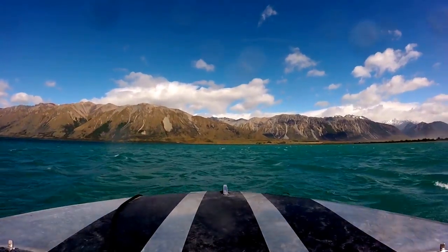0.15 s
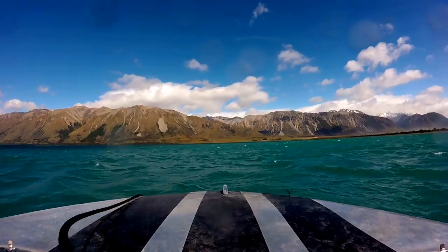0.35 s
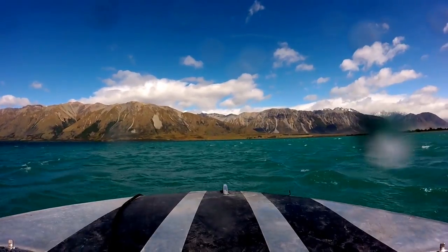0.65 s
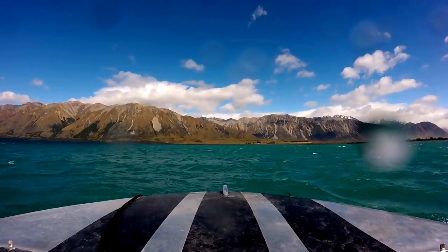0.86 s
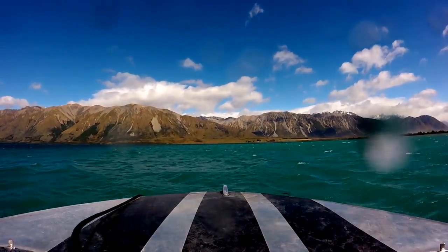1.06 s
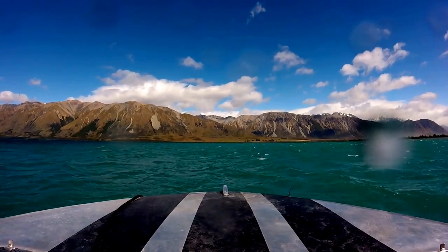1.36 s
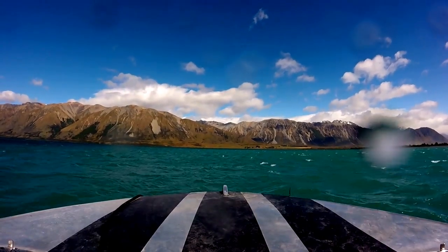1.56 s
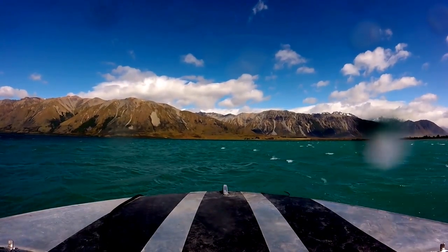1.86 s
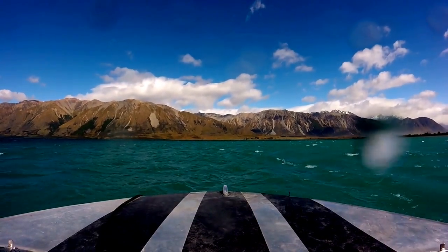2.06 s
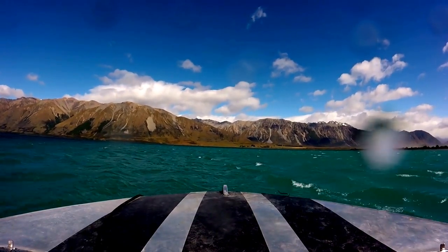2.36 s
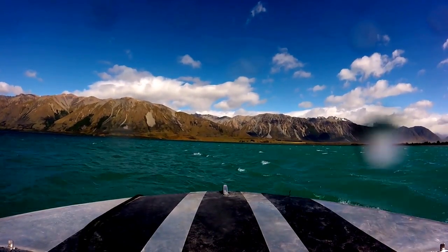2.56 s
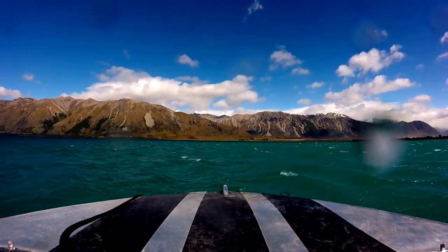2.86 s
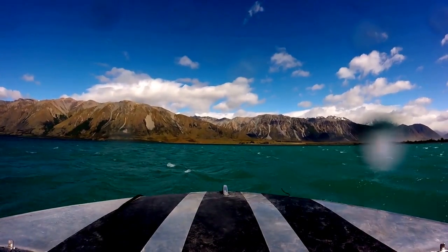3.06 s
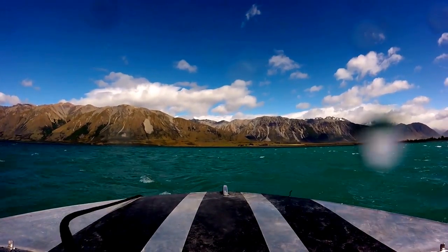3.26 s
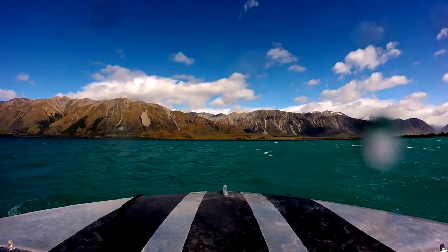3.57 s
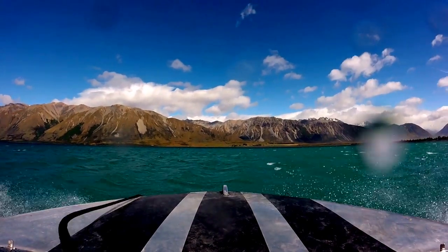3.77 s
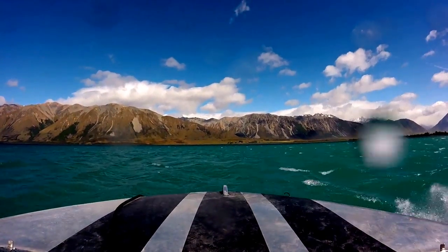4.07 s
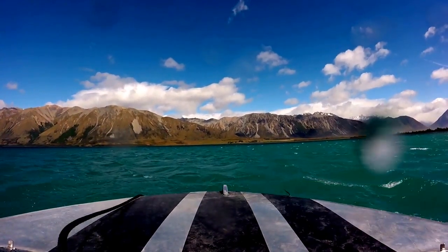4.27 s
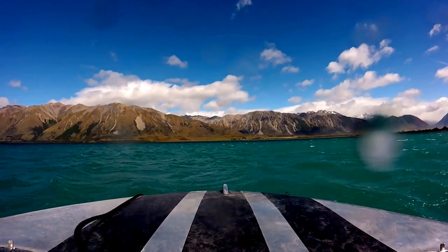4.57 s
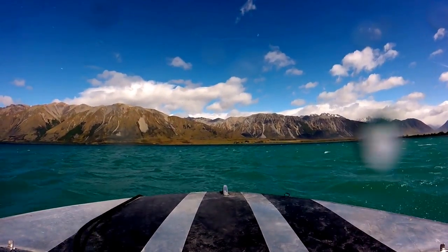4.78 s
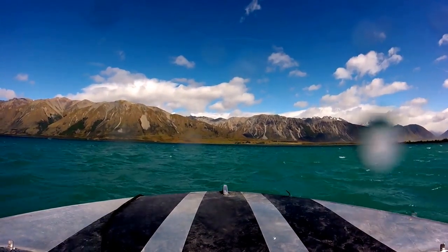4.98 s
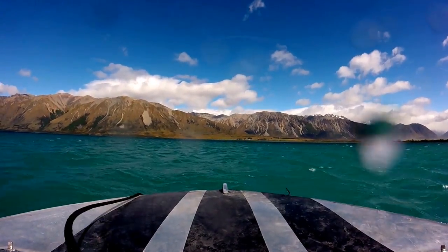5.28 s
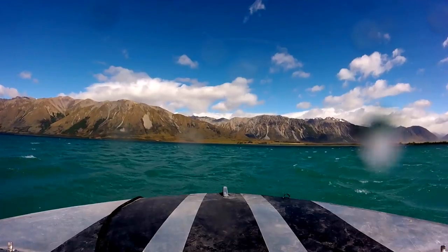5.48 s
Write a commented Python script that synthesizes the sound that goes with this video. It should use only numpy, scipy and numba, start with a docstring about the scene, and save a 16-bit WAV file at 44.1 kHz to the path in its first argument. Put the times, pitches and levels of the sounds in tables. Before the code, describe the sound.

A jet boat planes over a choppy lake, heard from its foredeck by a small camera in a sealed case. Throughout, a deep, nearly tonal hull boom around 90 Hz throbs unevenly, with low water drumming. A wavering engine drone near 250 Hz and a flickering hum near 400 Hz sit beneath gusty, hollow wind and spray with little high treble. Dull wave slams with sagging pitch land irregularly, about every 0.2 to 0.6 seconds. From roughly 1.85 to 2.3 seconds the engine dips, growling and gurgling, then picks up again. Wind swells around 2.55. Heavier thumps hit at 3.6 and 4.05, then sharp hard knocks at 4.66 and 5.39 ring the deck briefly with bright ticks. Small spray ticks dot the rest, clustering around 5.0 to 5.2. Automatic gain ducks everything after strong hits and swells back. The ride continues to the end at about 5.6 seconds.

```python
"""Out on a choppy lake, on the foredeck of a planing jet boat, heard by a small camera in a sealed case.
An engine drone and a hum from the engine bay, both wavering sines, lie under a rush of wind and spray,
noise through the resonances of deck and case. The chop keeps the hull's low mode booming, a sine in throbs,
and drums on the hull as low noise; wave slams are short swings of sagging pitch, with ticks on the case.
The camera's gain control ducks everything after strong peaks."""
import sys
import numpy as np
from scipy import signal
from scipy.fft import rfft, irfft, next_fast_len
from scipy.io import wavfile
from scipy.ndimage import uniform_filter1d
from numba import njit

SR = 44100
rng = np.random.default_rng(int(sys.argv[2]) if len(sys.argv) > 2 else 0)


def transcribe(signal):
    """Save signal, clipped to [-1, 1], as a 16-bit WAV file at the path in sys.argv[1]."""
    frames = np.atleast_2d(signal).T
    limited = np.clip(frames, -1, 1)
    pcm = np.round(limited * 32767).astype(np.int16)
    wavfile.write(sys.argv[1], SR, pcm)


N = 248283
TIME = np.arange(N) / SR

# waves slamming the bottom, levels ahead of the gain control: (time [s], peak of the push [dB],
# starting pitch [Hz], swell time [ms], rms of the boom's ring [dB], pitch of that ring [Hz])
WAVE_SLAMS = [(0.145, -0.5, 99.4, 14.3, -8, 90), (0.511, -1.5, 96.6, 13.4, -18, 90),
              (0.753, -1.5, 100.2, 14.2, -2.5, 96.1), (1.16, -2, 100, 15.2, -6.5, 87.6),
              (1.523, -1, 100, 20.5, 1, 90.5), (1.983, -16, 91, 11.6, -9.5, 88),
              (2.104, -8, 93.2, 15.3, -23, 88.9), (2.683, 0.5, 102, 15.9, -3, 90.8),
              (3.004, -6, 102.3, 10.4, -10, 92.8), (3.129, -5, 100.7, 11, -7.5, 95.1),
              (3.569, 5, 93.2, 13.8, -3.5, 93.8), (4.0497, 5.5, 98.4, 13.3, -3, 94.6),
              (4.385, -2, 99, 12.5, -14, 89), (4.6621, 11.5, 80, 8, 2.5, 103.4),
              (4.972, -2, 99, 10.73, -10, 98.75), (5.3916, 11, 76.9, 9.07, 3.5, 96.4)]
QUICK_BELOW_MS = 9.5  # slams that swell faster than this knock, and ring the deck


def undb(db):
    """Gain of a level in dB."""
    return 10 ** (np.asarray(db) / 20)


def curve(table):
    """Columns of a table, interpolated sample by sample over its times."""
    s, *columns = np.transpose(table)
    return [np.interp(TIME, s, column) for column in columns]


def walk(rate):
    """Random levels held 1 / rate s and smoothed twice; spread near 1."""
    hold = int(SR / rate)
    steps = np.repeat(rng.standard_normal(N // hold + 1), hold)
    return 1.265 * uniform_filter1d(uniform_filter1d(steps, hold), hold)[:N]


def wavering_phase(hz, share, rate):
    """Phase [rad] of a tone whose pitch wanders at random by a share of itself."""
    return 2 * np.pi * np.cumsum(hz * (1 + share * walk(rate))) / SR


def coloured(spectrum):
    """Noise with a spectrum given in dB per Hz."""
    size = next_fast_len(N)
    hz, db = np.transpose(spectrum)
    bins = np.fft.rfftfreq(size, 1 / SR)
    # log pitch scale, near silence below the lowest point; 1 Hz is added to avoid log(0)
    shape = np.interp(np.log(bins + 1), np.log(hz), db, left=-200)
    white = rfft(rng.standard_normal(size))
    return irfft(white * undb(shape), size)[:N] * np.sqrt(SR / 2)


def ring(hz, width, drift=0., rate=9.):
    """Noise through a resonance applied twice, its centre wandering; rms 1."""
    b, a = signal.iirpeak(hz, hz / width, SR)
    y = rng.standard_normal(N + SR)
    for _ in range(2):
        y = signal.lfilter(b, a, y)
    # reading at an uneven speed moves the centre; the first half second is skipped
    place = SR / 2 + np.cumsum(1 + drift * walk(rate))
    y = np.interp(place, np.arange(N + SR), y)
    return y / y.std()


def engine():
    """Engine orders that waver, and swell and fade with the jet's load; at a low rate it growls and gurgles."""
    # the engine's course: (time [s], mean firing rate [Hz], load [dB])
    engine_course = [(0, 249.6, 4), (.15, 250, 7), (.35, 252, -5), (.5, 253.7, 1.5), (.7, 250, -2.5),
                     (.85, 250, 6.5), (1.05, 248.9, 0), (1.25, 249, 2.5), (1.4, 248, -3), (1.62, 247.4, 3),
                     (1.85, 234.8, 3.5), (1.9, 232, -2), (1.97, 238.8, 4.5), (2.07, 238, -6),
                     (2.18, 235.3, -5), (2.27, 235, 2), (2.4, 246, 6), (2.65, 248, 9), (2.85, 248, -5),
                     (3.1, 252.4, 5), (3.22, 252, -5.5), (3.52, 248, -3), (3.7, 247.4, 4.5), (4.0, 248, 4),
                     (4.2, 249, 4), (4.35, 249, 4.5), (4.49, 248.6, 10), (4.56, 248.4, 5), (4.65, 247, 9),
                     (4.9, 253.4, -7.5), (5.3, 254, 0), (5.63, 253.2, 0.5)]
    # engine lines at 0 dB load: (multiple of the firing rate [1], rms [dB])
    engine_lines = [(1 / 2, -53.5), (2 / 3, -44.5), (5 / 6, -48.5), (1, -37), (7 / 6, -50.5), (2, -51)]
    # extra level of the line just under the firing rate: (time [s], level [dB])
    under_course = [(0, -1), (1.75, 4), (1.84, 13), (1.9, 2), (2.06, 0), (2.12, 18), (2.18, 3),
                    (2.27, 17.5), (2.32, 0), (3.78, -1), (3.84, 12), (3.9, -3.5), (5.63, -5)]
    growl_below_hz, growl_db_per_hz = 243.3, 0.29

    hz, load_db = curve(engine_course)
    load_db = load_db + 1.5 * walk(11.0)  # the jet's grip on the water comes and goes
    phase = wavering_phase(hz, 0.014, 25)
    # pulled down to a low rate, the engine growls between its main orders
    growl_db = growl_db_per_hz * np.clip(growl_below_hz - hz, 0, None)
    under_db = curve(under_course)[0]

    # water gurgling in the jet, 3.1 dB up per dB of growl
    gurgle_db = -47 + 3.1 * growl_db + 2.2 * walk(22)
    out = undb(gurgle_db) * ring(215.4, 42, drift=.15, rate=11.0)
    for multiple, db in engine_lines:
        level_db = db + load_db + 3.5 * np.tanh(walk(20))
        if multiple % 1 > 0:
            level_db = level_db + growl_db
        if multiple == 5 / 6:
            level_db = level_db + under_db
        out += np.sqrt(2) * undb(level_db) * np.sin(multiple * phase)
    return out


def hum():
    """The engine bay's hum near 400 Hz: a sine that wavers, comes and goes."""
    # mean course of the hum: (time [s], pitch [Hz], rms [dB])
    hum_course = [(0.0, 420, -34), (0.05, 416, -43.5), (0.09, 385.6, -42), (0.2, 430.0, -43),
                  (0.31, 420.9, -48), (0.48, 386.5, -45), (0.77, 390.5, -37.5), (0.85, 413.6, -44),
                  (1.03, 414.3, -44), (1.1, 382, -46), (1.16, 400, -35), (1.22, 419, -57),
                  (1.36, 413.3, -30.5), (1.46, 411, -53.5), (1.54, 432, -42), (1.58, 401.9, -49),
                  (1.77, 398, -31), (1.83, 396.7, -43), (1.96, 389.5, -34), (2.01, 401.5, -36),
                  (2.02, 411, -47), (2.12, 387, -34), (2.15, 389.9, -50), (2.18, 389.2, -36),
                  (2.38, 396.2, -46), (2.49, 403, -35.5), (2.76, 405.1, -53), (2.79, 385.6, -52),
                  (2.95, 428.4, -40), (3.12, 417.3, -36), (3.21, 430.0, -46), (3.37, 398.4, -45),
                  (3.48, 405.8, -43), (3.57, 433, -44), (3.62, 394, -56), (3.73, 417.1, -40),
                  (3.78, 390, -45), (3.83, 418.7, -46), (3.87, 408.5, -30.5), (3.9, 397.1, -53),
                  (4.0, 390.0, -39.5), (4.11, 385.9, -56), (4.15, 412, -50), (4.34, 413, -41.5),
                  (4.55, 412.4, -37.5), (4.67, 388.7, -34), (4.75, 407, -59), (4.91, 420.4, -47),
                  (5.08, 388, -49), (5.18, 426.6, -33), (5.25, 419, -48), (5.35, 426.5, -39),
                  (5.39, 394, -26), (5.43, 399, -58), (5.54, 419.5, -60), (5.63, 397.4, -48)]
    hz, db = curve(hum_course)
    level = np.sqrt(2) * undb(db + 0.61 * walk(15))
    return level * np.sin(wavering_phase(hz, 0.01013, 25))


def rush():
    """Wind and spray excite every resonance; all swell together, narrow ones also flicker alone."""
    # resonances of deck and case, ahead of gusts: (centre [Hz], width of one pass [Hz], rms [dB])
    case_modes = [(247.5, 22.8, -40), (399.4, 88, -41.5), (473.6, 84, -40.5), (566, 67, -53),
                  (771, 59, -44.5), (859, 52, -47.5), (934.3, 70, -40), (1017, 40, -48), (1245, 70, -46),
                  (1380.5, 87, -37.5), (1526, 99, -39.5), (1727.4, 38, -42.5), (1890, 48, -69),
                  (2041, 220, -43.5), (2300, 330, -46), (2419, 150, -39.5), (2570, 21, -45.5),
                  (2700, 170, -47), (2870, 50, -50.5), (2892, 130, -51.5), (3360, 220, -61.5),
                  (3594, 350, -55), (3844, 70, -60.5), (4330, 150, -63), (5485, 220, -66), (5910, 200, -65),
                  (6480, 570, -64), (7460, 120, -73), (9200, 900, -98.5)]
    # broad hiss between the resonances, ahead of gusts: (frequency [Hz], density [dB per Hz])
    hiss_spectrum = [(500, -73.5), (680, -76), (1000, -65), (2000, -71), (3000, -73.5), (4500, -88.5),
                     (7000, -102), (8500, -112), (11000, -125), (16000, -135)]
    # treble against the rest of the rush: (time [s], level [dB])
    treble_course = [(0, 2), (.2, 1), (.45, 2), (.7, 1), (1.0, 0), (1.4, 1), (1.8, 0), (2.2, -1), (2.6, -1),
                     (3.0, 0), (3.4, 0), (3.8, -1), (4.2, 0), (4.6, 0), (4.85, 1), (5.1, 2), (5.3, 1),
                     (5.63, 1)]
    # wind and spray strength: (time [s], level [dB])
    gust_course = [(0, 1.5), (.035, 4), (.06, 2), (.14, 2), (.2, 0), (.33, 0.5), (.4, 2.5), (.46, 5),
                   (.52, 2), (.6, 0.5), (.76, 1), (.82, -2), (.9, 0), (1.0, 0.5), (1.1, 0.5), (1.2, 2.5),
                   (1.3, 1), (1.36, -3), (1.41, -2.5), (1.47, 0), (1.53, 0), (1.58, -2), (1.68, 0),
                   (1.95, 2.5), (2.05, 0), (2.2, 1), (2.4, 0.5), (2.55, 6.5), (2.69, 3), (2.75, -2),
                   (2.82, -1), (2.9, 2), (2.98, -2.5), (3.1, 1), (3.22, 2.5), (3.4, 2.5), (3.56, 3),
                   (3.7, -5.5), (3.9, 1.5), (4.05, -1), (4.2, 0.5), (4.33, 4.5), (4.385, 4), (4.42, 3),
                   (4.48, 2), (4.53, 1.5), (4.59, 4.5), (4.63, 7), (4.665, 7.5), (4.7, -0.5), (4.8, 1),
                   (4.97, 1), (5.05, 0), (5.16, 3.5), (5.25, 0), (5.35, 5), (5.47, 0), (5.63, 2)]
    drift = .026  # share by which each resonance wanders as deck and case flex
    treble_hz, flurry_db = 2800, 1.5

    wash = coloured(hiss_spectrum)
    for hz, width, db in case_modes:
        flicker_db = 0.98 * min(150 / width, 1) * walk(18)
        wash += undb(db + flicker_db) * ring(hz, width, drift)
    low = signal.filtfilt(*signal.butter(2, treble_hz, fs=SR), wash)
    # spray flurries flicker in the treble
    treble_db = curve(treble_course)[0] + flurry_db * walk(45)
    wash = low + undb(treble_db) * (wash - low)
    return undb(curve(gust_course)[0] + 1.1 * walk(30)) * wash


def ease(u):
    """Smooth rise from 0 to 1 while u goes from 0 to 1."""
    return np.sin(np.pi / 2 * np.clip(u, 0, 1)) ** 2


def chop():
    """Level in dB and pitch of the boom: throbs that swell and fade, and a ring after each slam."""
    # throbs of the hull boom, ahead of the gain control:
    # (start [s], length [s], rms at the top [dB], pitch [Hz], place of the top [0-1])
    boom_throbs = [(0.026, 0.05, -7, 90.8, 0.4), (0.077, 0.13, -14, 86.5, 0.01),
                   (0.155, 0.044, -15, 92, .3), (0.231, 0.44, -7.5, 86.03, 0.21),
                   (0.548, 0.035, -8, 92, 0.4), (0.557, 0.22, -12.5, 89.7, 0.61),
                   (0.871, 0.12, -9.5, 88.34, 0.44), (0.984, 0.13, -11, 84.3, 0.77),
                   (1.111, 0.085, -15, 93.6, 0.3), (1.252, 0.13, -10.5, 81.04, 0.77),
                   (1.363, 0.19, -10.5, 90.6, 0.07), (1.593, 0.076, -19.5, 87.8, 0.4),
                   (1.668, 0.1, -13, 89.8, 0.04), (1.783, 0.044, -14.5, 84.2, 0.63),
                   (1.832, 0.058, -12.5, 92.6, 0.58), (1.891, 0.095, -19, 85.6, 0.66),
                   (2, 0.12, -12, 93, 0.53), (2.147, 0.07, -11, 97.4, 0.33),
                   (2.209, 0.16, -13.5, 85.56, 0.62), (2.391, 0.092, -13, 84.5, 0.47),
                   (2.494, 0.19, -12.5, 82.9, 0.36), (2.771, 0.034, -13, 80, 0.34),
                   (2.816, 0.25, -13.5, 83.23, 0.48), (3.036, .11, -17.5, 91.6, .4),
                   (3.145, 0.14, -9.5, 86.3, 0.5), (3.25, 0.24, -10.5, 86.2, 0.34),
                   (3.512, 0.095, -10, 98.8, 0.56), (3.593, 0.03, -5, 92, 0.4),
                   (3.634, 0.035, -6, 90, 0.36), (3.684, 0.067, -15, 91.74, 0.47),
                   (3.763, 0.066, -12, 93.5, 0.75), (3.826, 0.11, -9, 90.2, 0.65),
                   (3.935, 0.036, -17, 83, 0.3), (3.979, 0.071, -14, 86.86, 0.43),
                   (4.072, 0.04, -4, 92, 0.4), (4.159, .11, -15, 84.3, 0.4), (4.263, 0.076, -9, 90.6, 0.6),
                   (4.331, 0.12, -13, 83.4, 0.65), (4.463, 0.043, -14, 85.8, 0.6),
                   (4.503, 0.086, -10, 86, 0.3), (4.561, 0.14, -8.5, 85.3, 0.6),
                   (4.792, 0.13, -12.5, 86, 0.65), (4.92, 0.055, -17.5, 83.75, 0.38),
                   (5.002, 0.037, -4.5, 91.2, 0.46), (5.046, 0.049, -18, 97.8, 0.23),
                   (5.123, 0.18, -7.5, 88.6, 0.83), (5.295, 0.04, -24, 89.4, 0.58),
                   (5.327, 0.049, -19, 88.6, 0.43), (5.422, 0.089, -2.5, 98.3, 0.67),
                   (5.512, 0.14, -7, 90.5, 0.43)]
    calm_db, calm_hz = -27.5, 90.6  # the boom between throbs
    throb_round = 0.4  # small = flat top and steep flanks
    ring_delay_s, ring_t60_s = 0.028, 0.22  # the ring's top after a slam, and its decay by 60 dB

    # powers add up, and the pitch is their weighted mean
    power = np.full(N, undb(2 * calm_db))
    pitch = power * calm_hz
    for s, length, db, hz, top in boom_throbs:
        u = (TIME - s) / length
        swell = ease(u / top) * ease((1 - u) / (1 - top))
        part = (undb(db) * swell ** throb_round) ** 2
        power, pitch = power + part, pitch + part * hz
    for s, *_, db, hz in WAVE_SLAMS:
        fade_db = -60 * np.clip(TIME - s - ring_delay_s, 0, None) / ring_t60_s
        part = (undb(db + fade_db) * ease((TIME - s) / ring_delay_s)) ** 2
        power, pitch = power + part, pitch + part * hz
    return 10 * np.log10(power), pitch / power


def swing(t, hz, ms):
    """Phase of the bottom t seconds into a slam: the pitch sags; a quick slam starts with a high knock."""
    sag_s = 0.069  # a slam's pitch falls to 1 / e in this time
    knock_hz, knock_s = 320, 0.0034  # a quick slam starts so much higher, dying away by 1 / e in this time
    cycles = hz * sag_s * (1 - np.exp(-t / sag_s))
    if ms < QUICK_BELOW_MS:
        cycles = cycles + knock_hz * knock_s * (1 - np.exp(-t / knock_s)) + 1 / 2
    return 2 * np.pi * cycles


def boom(db, hz, pressed):
    """The hull's lowest mode, nearly a sine; chop jostles it, a landing hull is damped and pulled into step."""
    lock_swells = 1.563  # so many swell times into a slam, the boom swings in step with it
    lock_lead_s = 0.027  # it starts falling into step this long before the slam
    octave_db = -24.5  # the boom swings a little lopsided, so its octave sounds

    phase = wavering_phase(hz, 0.042, 30)
    for s, _, slam_hz, ms, *_ in WAVE_SLAMS:
        span = lock_swells * ms / 1000
        gap = swing(span, slam_hz, ms) - phase[int((s + span) * SR)]
        shortest_gap = np.angle(np.exp(1j * gap))
        phase = phase + shortest_gap * np.clip((TIME - s + lock_lead_s) / (span + lock_lead_s), 0, 1)
    level = np.sqrt(2) * undb(db + 1.2 * walk(45))
    damping = 1 - np.clip(1.23 * pressed, 0, 1)
    octave = undb(octave_db + 2.5 * walk(8)) * np.cos(2 * phase)
    return level * damping * (np.sin(phase) + octave)


def drumming(boom_db):
    """The chop that feeds the boom also drums on the whole hull: low noise that follows the boom."""
    # water on the hull with the boom at 0 dB: (frequency [Hz], density [dB per Hz])
    rumble_spectrum = [(15, -50), (30, -49.5), (60, -43), (90, -30), (125, -51), (200, -54.5), (330, -55.5),
                       (600, -99)]
    share = 0.25  # dB of rumble per dB of boom
    smooth_db = uniform_filter1d(boom_db, SR // 25)
    return undb(share * smooth_db + 2.25 * walk(15)) * coloured(rumble_spectrum)


def slams():
    """Each wave pushes the bottom in and it swings back, slower as water loads it; also gives the contact."""
    deck_hz, deck_db, deck_t60_s = 365, -19.5, .12  # a quick slam leaves the deck ringing
    full_press_db = -16  # a slam this strong presses fully on the boom

    out, push, pressed = np.zeros((3, N))
    t = np.arange(SR // 12) / SR
    for s, db, hz, ms, *_ in WAVE_SLAMS:
        start = int(s * SR)
        here = slice(start, start + len(t))
        quick = ms < QUICK_BELOW_MS
        u = t * 1000 / ms
        # contact swells to 1 at u = 1; a higher power makes it more pointed
        contact = (u * np.exp(1 - u)) ** (2.7 if quick else 3.7)
        out[here] += undb(db) * contact * np.sin(swing(t, hz, ms))
        if quick:
            deck = undb(deck_db - 60 * t / deck_t60_s) * np.minimum(u, 1) * np.sin(2 * np.pi * deck_hz * t)
            out[here] += undb(db) * deck
        push[here] += undb(0.83 * db) * contact ** 3
        pressed[here] += contact * min(undb(db - full_press_db), 1)
    # the camera mount rattles at each slam: very broad noise
    rattle = undb(-49 + 2.1 * walk(350)) * push * ring(8800, 20000)
    return out + rattle, pressed


def ticks():
    """Spray and fittings tick on the case: short bright bursts of noise that decay at once."""
    # burst levels ahead of the gain control: (time [s], starting level [dB])
    case_ticks = [(.769, -40), (.791, -52), (.933, -49.5), (1.396, -43), (1.54, -46), (3.302, -44),
                  (3.66, -43), (4.086, -42), (4.668, -26), (4.975, -52), (5.013, -44), (5.022, -45),
                  (5.087, -46), (5.113, -45), (5.193, -48), (5.4, -25.5), (5.404, -33)]
    decay_s = 0.00092  # to 1 / e
    shape = np.zeros(N)
    for s, db in case_ticks:
        shape += undb(db) * (TIME >= s) * np.exp(-np.clip(TIME - s, 0, 1) / decay_s)
    return shape * ring(7800, 7800)


def scene():
    """All sources at the microphone, ahead of the case's muffling."""
    boom_db, boom_hz = chop()
    blows, pressed = slams()
    drone = engine() + hum()
    hull = boom(boom_db, boom_hz, pressed) + drumming(boom_db) + blows
    return (drone + rush() + hull + ticks())[None]


@njit
def follow(x, attack, release, start):
    """Peak follower: quick rise, steady fall in dB."""
    e, out = start, np.empty(len(x))
    for i in range(len(x)):
        a = abs(x[i])
        e = e + attack * (a - e) if a > e else e * release
        out[i] = e
    return out


def record(dry):
    """The sealed case muffles the top; gain control ducks after peaks, tanh rounds what slips past."""
    muffle_hz, top_hz = 8900, 15700
    gain_top, gain_power = 0.4, 1.247  # peak at unity gain; a power above 1 overreacts to peaks
    attack_ms, release_db_s, slew_ms = 1.73, 50.5, 4

    inside = signal.sosfilt(signal.butter(6, muffle_hz, fs=SR, output="sos"), dry)
    attack = 1 - np.exp(-1000 / (attack_ms * SR))
    release = float(undb(-release_db_s / SR))
    peak = follow(inside[0], attack, release, 0.29)
    log_gain = np.log(gain_top / peak) * gain_power
    # the gain slews toward its goal
    keep = np.exp(-1000 / (slew_ms * SR))
    log_gain = signal.lfilter([1 - keep], [1, -keep], log_gain, zi=[keep * log_gain[0]])[0]
    held = 0.74 * np.tanh(inside * np.exp(log_gain) / 0.98)
    return signal.sosfilt(signal.ellip(8, .2, 70, top_hz, fs=SR, output="sos"), held)


dry = scene()
out = record(dry)
transcribe(out)
```